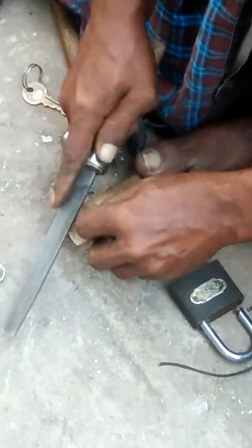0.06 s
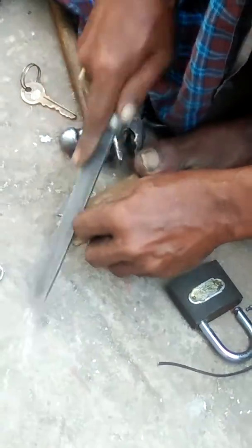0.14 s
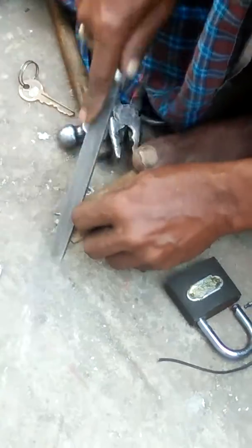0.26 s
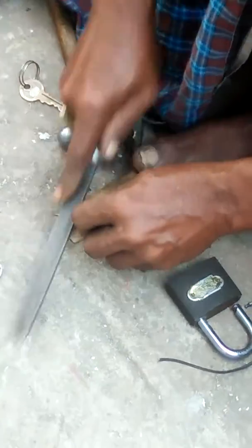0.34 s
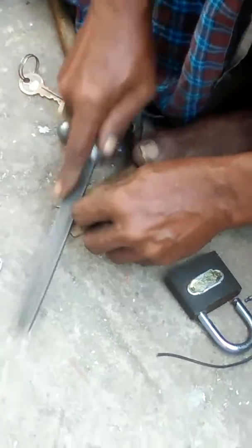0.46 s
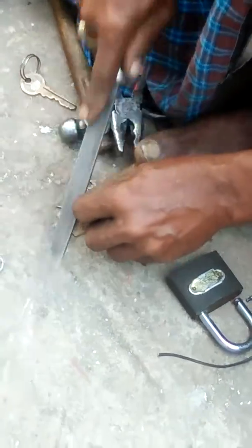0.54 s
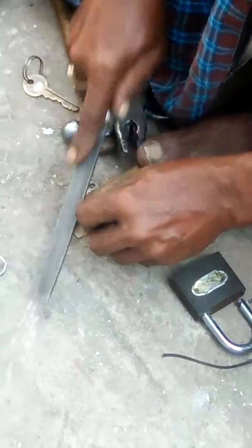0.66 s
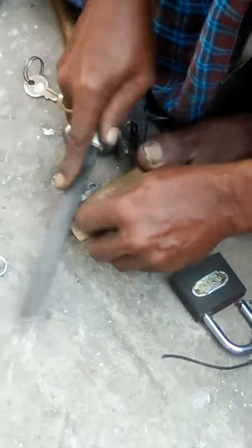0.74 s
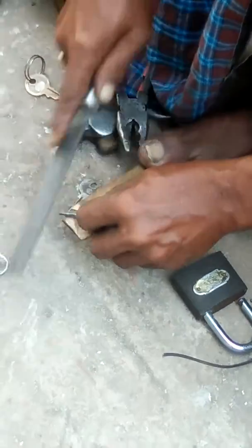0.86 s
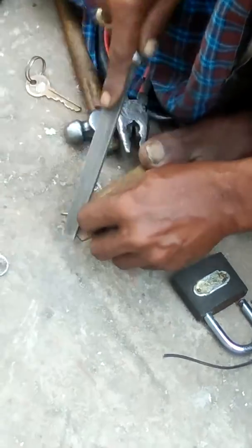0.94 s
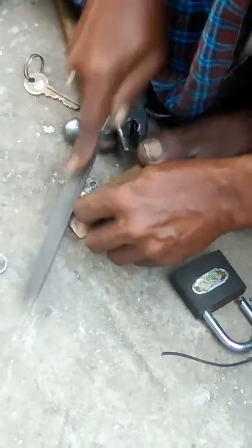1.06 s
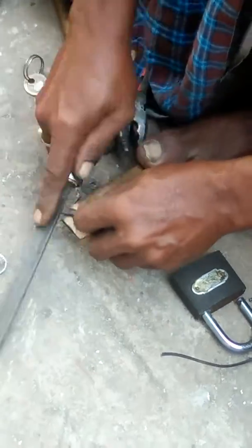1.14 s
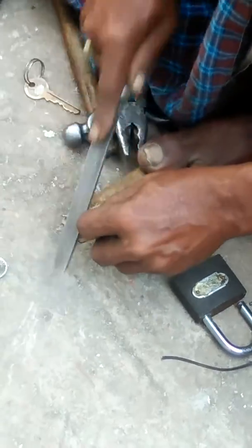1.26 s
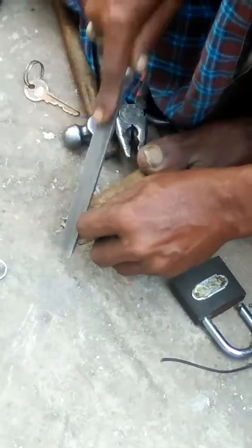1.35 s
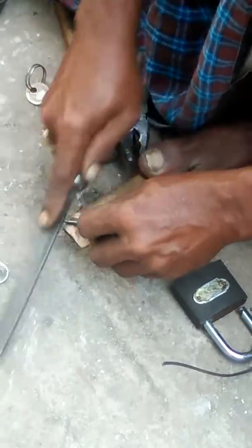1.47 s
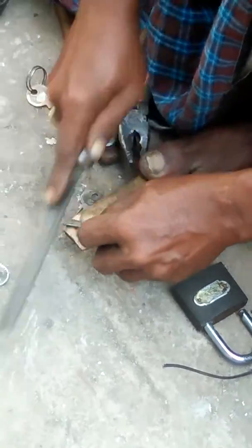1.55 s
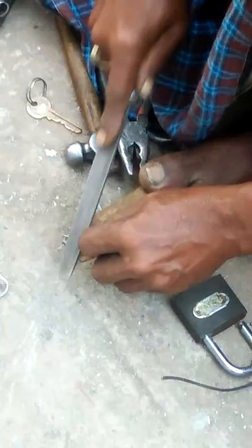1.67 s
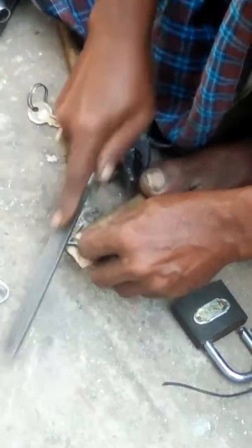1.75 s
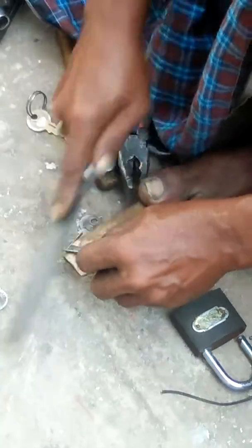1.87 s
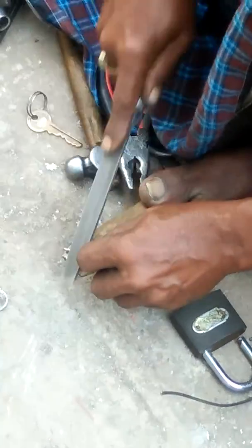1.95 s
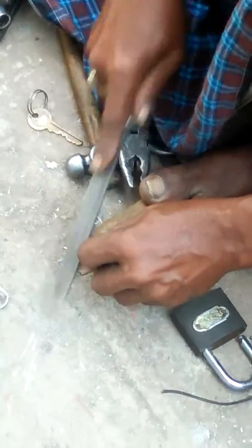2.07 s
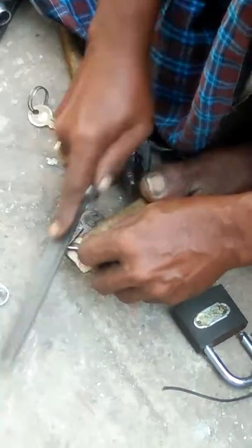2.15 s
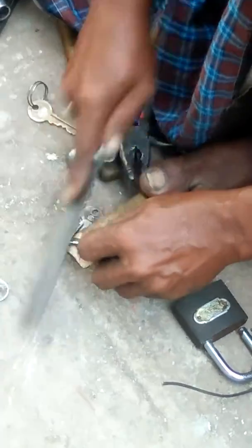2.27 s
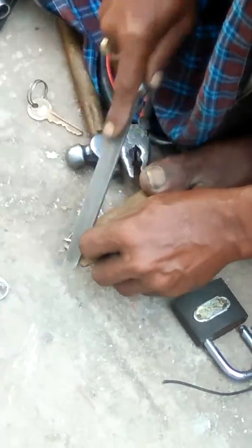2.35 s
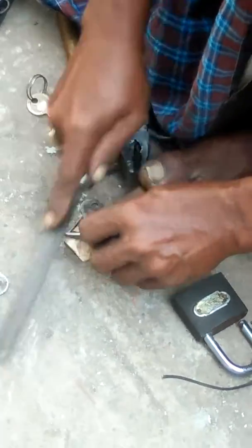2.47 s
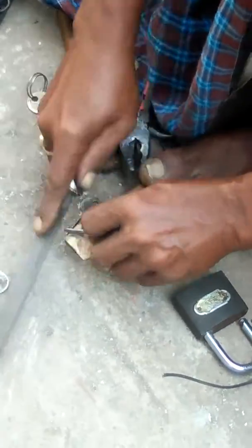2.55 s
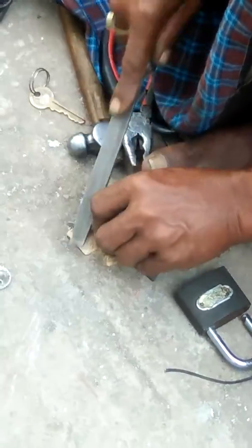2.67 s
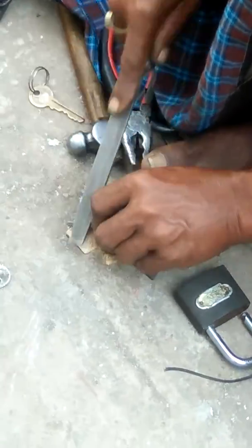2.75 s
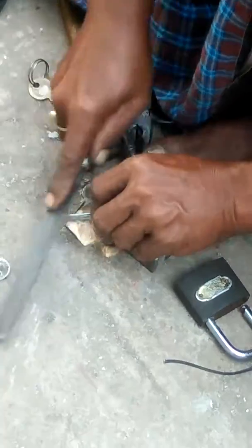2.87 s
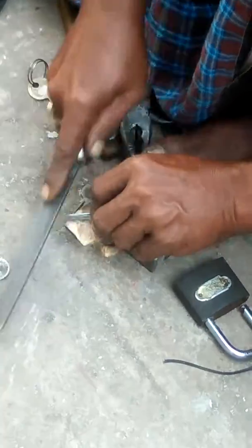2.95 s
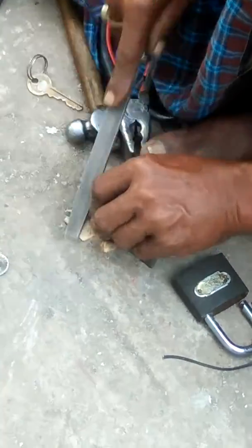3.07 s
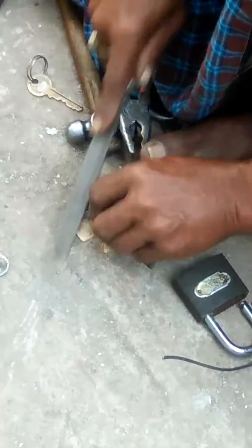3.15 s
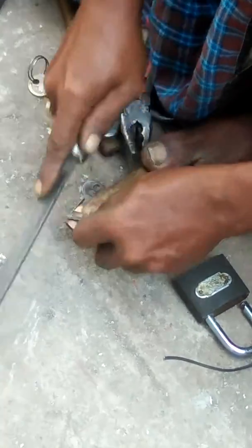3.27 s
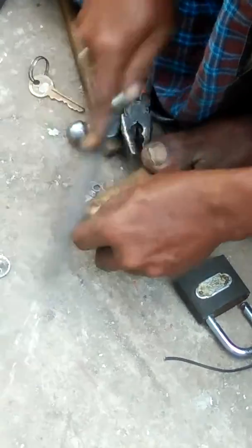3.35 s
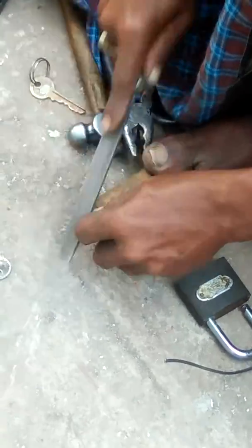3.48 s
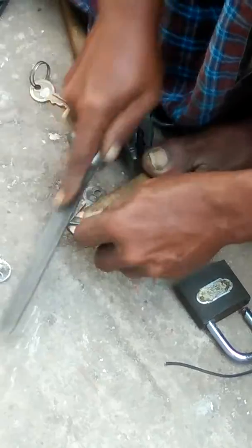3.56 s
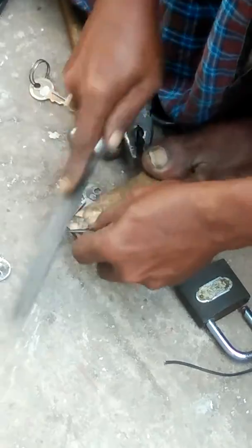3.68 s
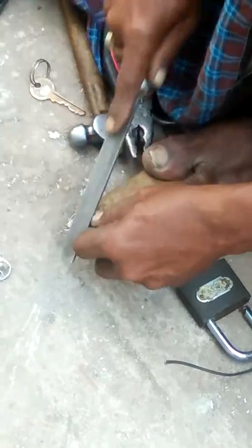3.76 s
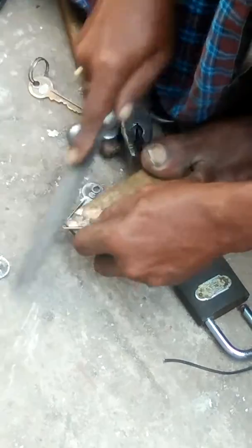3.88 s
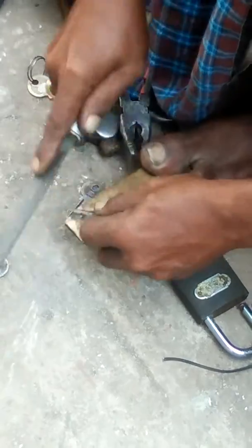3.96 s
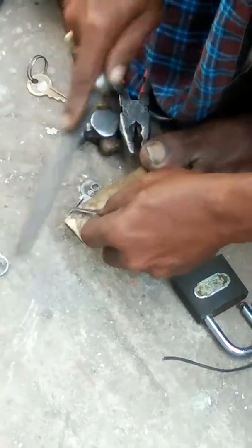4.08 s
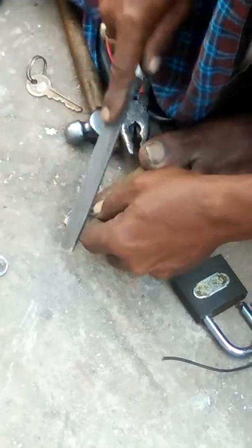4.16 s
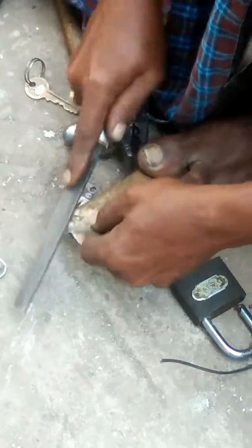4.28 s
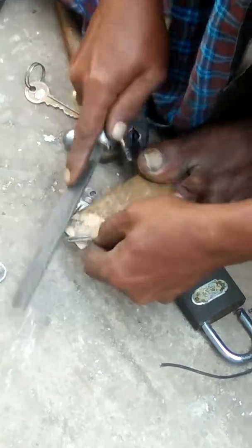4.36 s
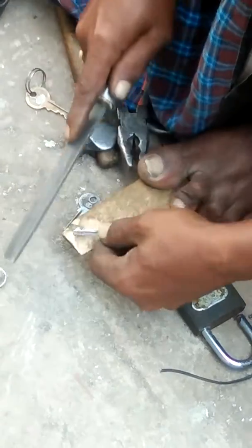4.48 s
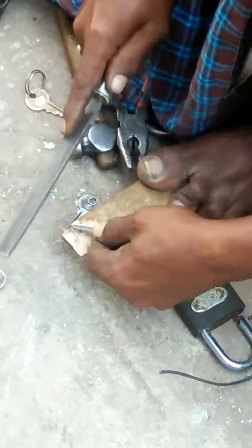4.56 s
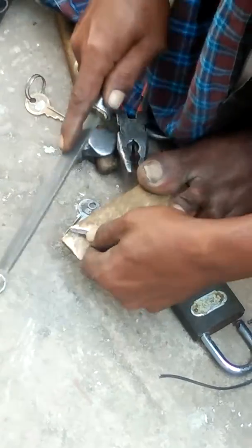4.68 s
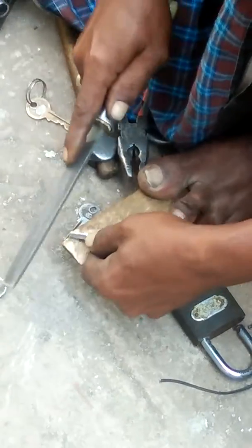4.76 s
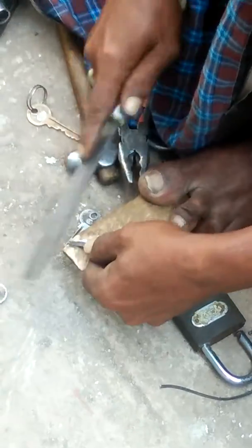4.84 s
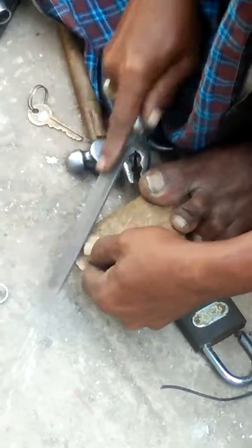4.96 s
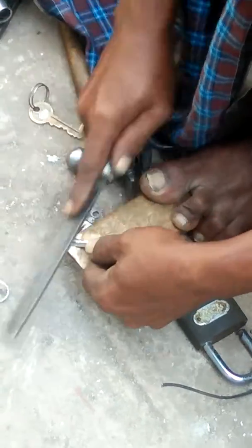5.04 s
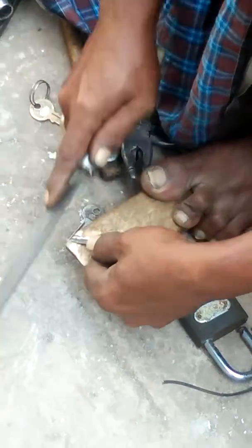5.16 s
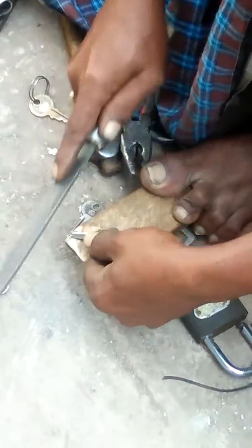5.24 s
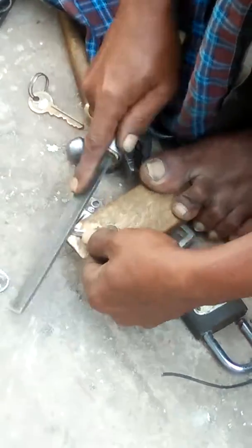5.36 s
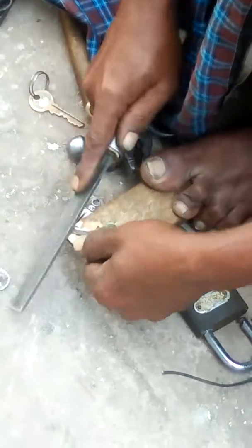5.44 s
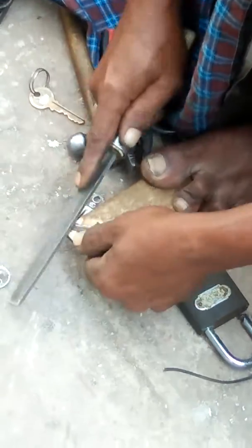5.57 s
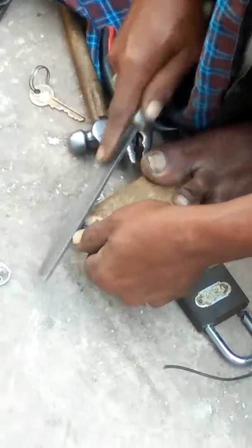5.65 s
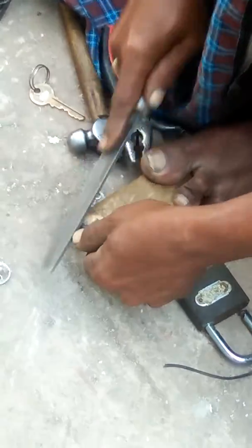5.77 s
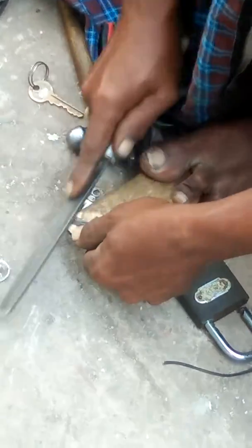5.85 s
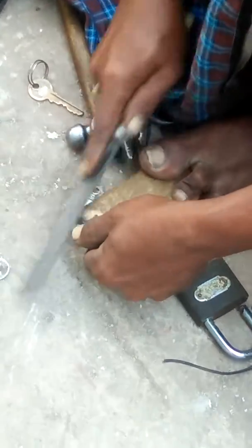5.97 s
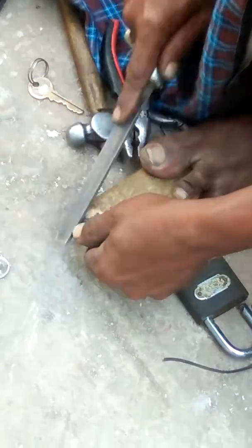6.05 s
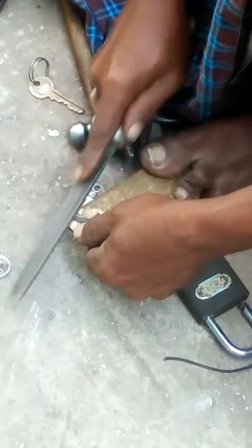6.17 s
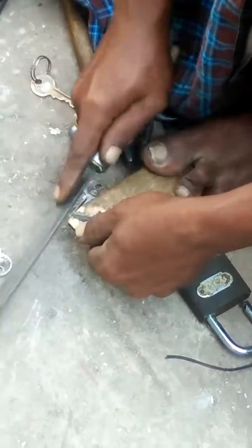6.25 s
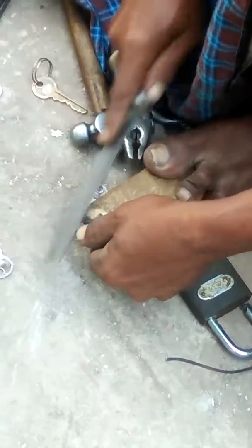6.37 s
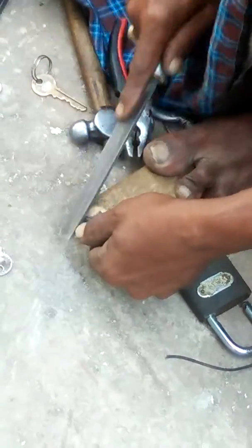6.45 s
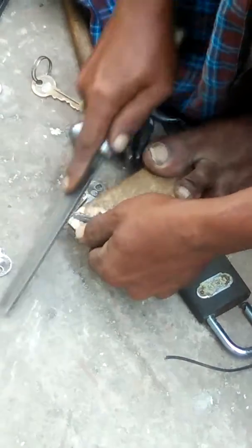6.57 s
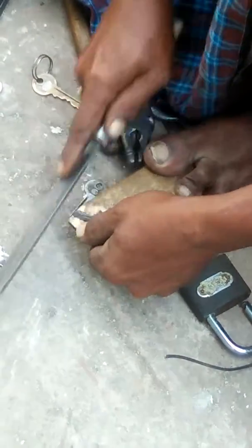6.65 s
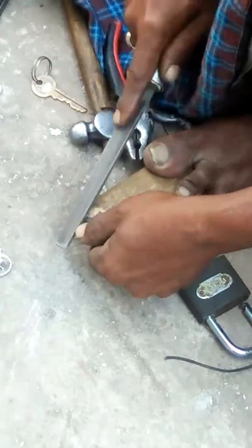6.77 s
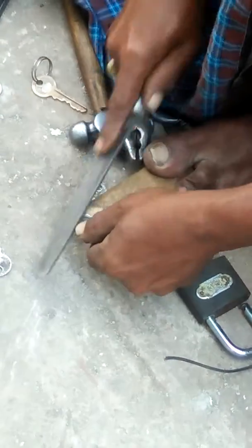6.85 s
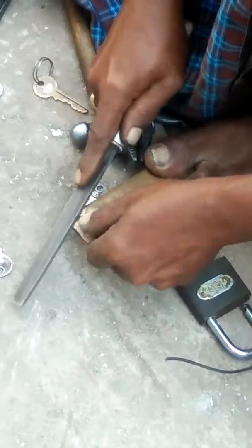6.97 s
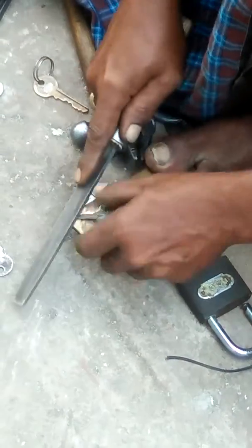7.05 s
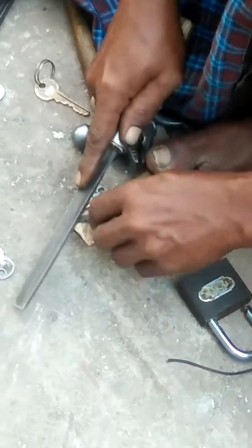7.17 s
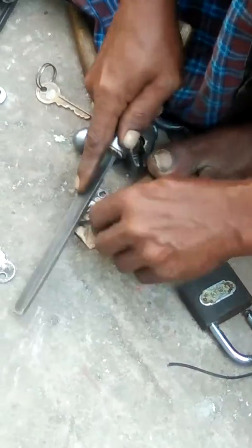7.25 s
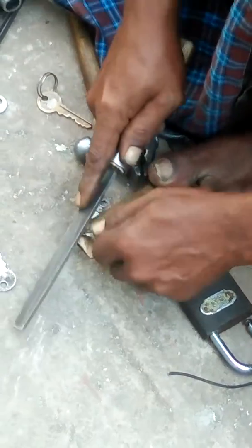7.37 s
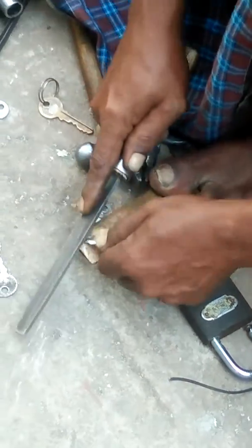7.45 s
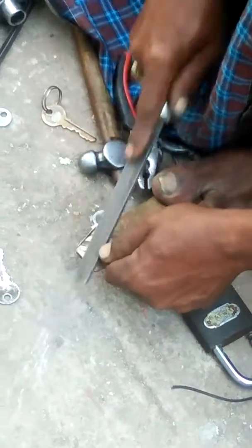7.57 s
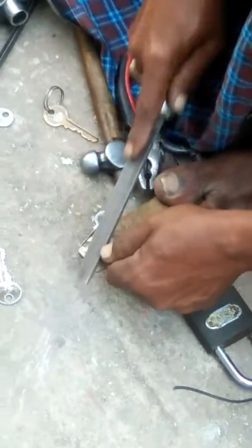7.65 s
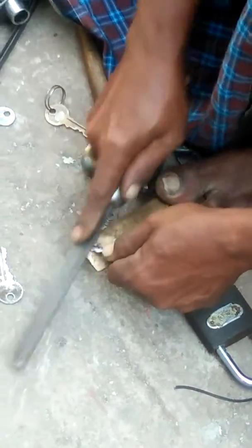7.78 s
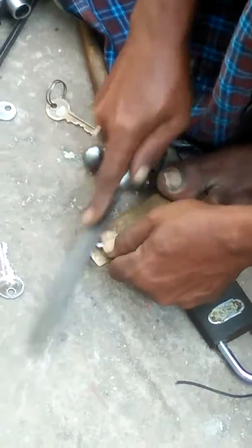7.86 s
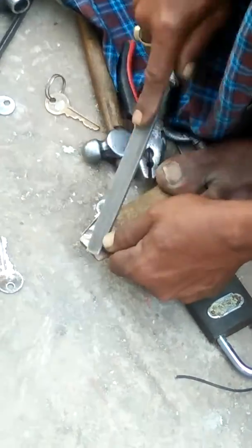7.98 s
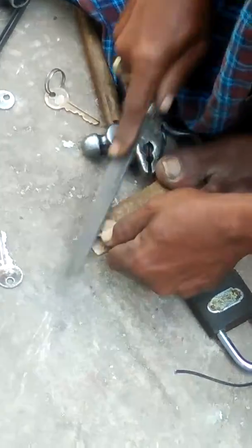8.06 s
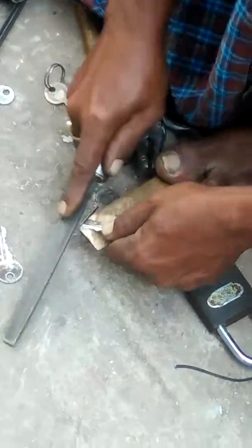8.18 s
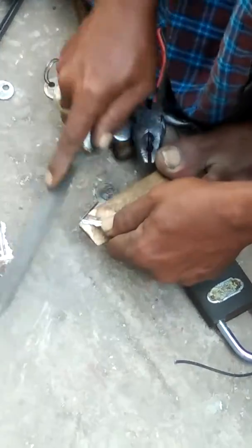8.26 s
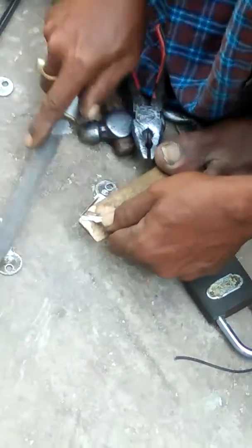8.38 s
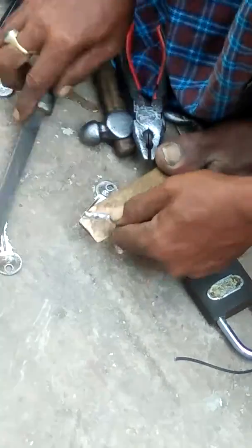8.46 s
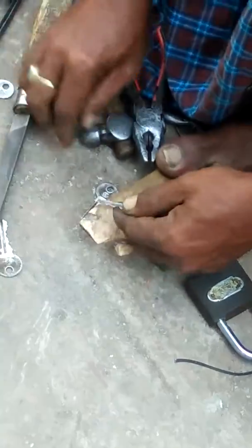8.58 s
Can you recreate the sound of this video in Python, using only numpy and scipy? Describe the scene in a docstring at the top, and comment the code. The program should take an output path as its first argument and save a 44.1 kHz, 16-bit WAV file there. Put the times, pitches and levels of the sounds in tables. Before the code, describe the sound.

A close microphone catches a flat metal file working a brass key on a wooden block, with a short reflection from nearby walls and a low, distant traffic murmur. Faint horn tones sound from 0 to 0.5 s, and slight handling bumps come around 0.4-0.6 s. Until about 4.1 s, brisk back and forward strokes alternate, roughly three pairs per second, each a gritty rasp of about a tenth of a second, swelling and easing. Small clicks and woody knocks mark contacts; brief high squeals chirp between 1.5 and 2.6 s, with a lower one at 3 s. Single scrapes follow near 4.4 and 5.1 s, separated by quiet gaps. Paired strokes return at 5.8-7.1 s, with light metal ticks at 6.1-6.9 s. Very faint horns appear around 7-7.5 s during a pause. Final rasping strokes run 7.65-8.35 s, then a tiny key-ring jingle at 8.5 s.

```python
"""A hand file cuts a brass key blank on a wooden block, close by; walls answer, a street murmurs far off.
0-0.5 s: distant horn tones. Up to 4.1 s: brisk back and forward strokes, tooth strikes plus torn-chip noise,
each an arch of speed and pressure; noise-burst taps on key and block; brief squeals at 1.5-3 s.
4.1-8.4 s: sparser strokes and taps; light metal ticks at 6.1-6.9 s, faint horn tones at 7-7.5 s.
8.5 s: a key ring jingles, as a sum of decaying modes."""
import sys
import numpy as np
from scipy import signal
from scipy.fft import rfft, irfft, next_fast_len
from scipy.io import wavfile
from scipy.ndimage import uniform_filter1d, map_coordinates

SR = 44100
rng = np.random.default_rng(int(sys.argv[2]) if len(sys.argv) > 2 else 0)


def wav_record(signal):
    """Record a signal, one row per channel, as 16-bit PCM in the file named by sys.argv[1]."""
    frames = np.transpose(np.atleast_2d(signal))
    bounded = np.clip(frames, -1, 1)
    # unit amplitude maps onto the largest positive 16-bit level
    quanta = np.round(bounded * 32767).astype(np.int16)
    wavfile.write(sys.argv[1], SR, quanta)


N = 380141

# far traffic colour: f/Hz, density/(dB per Hz)
STREET_COLOUR = [(25, -16.5), (55, -9), (170, -12.5), (330, -9), (600, -5.5), (1000, -5.5), (1550, -6.5),
                 (2000, -9), (4000, -35.5), (8000, -37), (14000, -48.5)]
# traffic swell: t/s, level/dB (only the departure from the mean counts)
STREET_SWELL = [(0.0, -75), (3.26, -74), (4.53, -78.5), (6.66, -72.5), (7.35, -76), (8.6, -78)]
# distant horn tones: start/s, end/s, f/Hz, level/dB
HORNS = [(0, 0.488, 736, -52), (0.077, 0.49, 789, -49.5), (0, 0.3, 1543, -55), (0.049, 0.43, 1620, -49),
         (6.951, 7.555, 1460, -66), (7.38, 7.48, 1627, -66)]
# shifts of the hand holding the microphone: start/s, end/s, level/dB
HANDLING = [(0.398, 0.452, -54.5), (0.524, 0.656, -64), (2.68, 2.857, -68), (3.926, 4.102, -65)]
# wall answer: f/Hz, t60/s
ROOM_T60 = [(200, .35), (1000, 0.48), (3000, 0.34), (5000, 0.27), (8000, 0.22), (14000, 0.36)]
# key ring nudges: t/s, level/dB
JINGLES = [(8.517, -40.5), (8.533, -40), (8.549, -41)]
# key ring modes: f/Hz, level/dB, t60/s
RING_MODES = [(2840, -1, 0.029), (3070, 2.5, .035), (3850, -6.5, 0.033), (7170, -31, 0.13),
              (9550, -33, .22)]
# light touches of loose metal: t/s, level/dB (before trim), ring f/Hz
TICKS = [(6.1355, -35, 4620), (6.5042, -31, 4400), (6.84, -35, 4740), (6.8608, -31, 4530)]
# file lands on the key or catches in the cut: t/s, level/dB (before trim), knock re click/dB (before trim)
TAPS = [(0.163, -23, -3.5), (0.6085, -21, -12.5), (0.738, -28, 5.5), (0.7679, -10.5, -12.5),
        (1.065, -19, -15), (1.491, -19, -10), (1.7398, -18, -18), (1.965, -19, -1), (2.186, -17.5, -18),
        (2.533, -16, -21), (2.8063, -20.5, -1.5), (3.1736, -27, 0), (3.267, -21, 1), (3.5548, -15.5, -19),
        (3.7616, -19, 3), (3.9036, -14, -9.5), (4.0655, -27.5, -1.5), (4.3213, -28.5, 9), (4.4524, -26, -4),
        (5.0762, -31.5, 11.5), (5.5274, -20, 6.5), (6.188, -29, -5.5), (6.573, -23, -23),
        (6.747, -18, -1.5), (6.9106, -16, -3), (8.3273, -17, -3)]
# landing, steel on brass: f/Hz, density/(dB per Hz)
CLICK_COLOUR = [(300, -54), (1500, -22), (2300, 0.5), (3100, 3.5), (4000, -4.5), (4800, -6), (6000, -18),
                (8500, -34.5), (14000, -40.5)]
# landing, block beneath: f/Hz, density/(dB per Hz)
KNOCK_COLOUR = [(150, -50.5), (480, -21.5), (720, 1), (1200, 6), (2000, -5), (5000, -59.5)]
# file sticks and sings: start/s, end/s, first f/Hz, last f/Hz, level/dB
SQUEALS = [(1.5, 1.57, 4750, 5100, -31), (1.845, 1.895, 4720, 4950, -33.5), (2.195, 2.25, 4750, 5000, -34),
           (2.545, 2.6, 4620, 4950, -28), (3.01, 3.045, 2310, 2310, -26.5)]
# back strokes: start/s, end/s, top tooth rate/Hz, chatter power share/0-1, body/dB, edge/dB, hiss/dB,
# level at hardest point/dB, hardest point/0-1 of stroke, sag at the ends/dB
BACK_STROKES = [(0, 0.197, 910, 0, 21.5, -12, 5, -58, 0.8, 0),
                (0.209, 0.364, 1252, 0, 11, 0, 0.5, -24.5, 0.64, 11),
                (0.578, 0.723, 1050, 0.04, 5.5, -4.5, -2.5, -23.5, 0.42, 16),
                (1.061, 1.121, 1456, 0.03, 2.5, -6, -1, -32.5, 0.4, 8),
                (1.337, 1.466, 1103, 0.15, 3, -7.5, 0.5, -23.5, 0.32, 14),
                (1.733, 1.83, 1307, 0, 9, -5, -2.5, -24.5, 0.28, 15.5),
                (2.082, 2.163, 1406, 0, 5.5, -9, -4, -23, 0.27, 13),
                (2.42, 2.515, 1412, 0.21, -5, -1, -1.5, -21, 0.35, 12.5),
                (2.803, 2.876, 1450, 0, -1.5, -0.5, -1.5, -25, 0.26, 15.5),
                (3.171, 3.243, 1153, 0.04, 10.5, 2.5, 0, -26.5, 0.36, 14.5),
                (3.549, 3.622, 1106, 0.01, 10.5, -6, 1, -30, 0.58, 12),
                (3.902, 3.962, 1095, 0, 5, 0, 2.5, -31, 0.4, 6.5),
                (5.769, 5.902, 1048, 0.13, 11.5, -15, -5, -36, 0.81, 29),
                (6.179, 6.242, 1050, 0, 10.5, -17, -7.5, -31.5, 0.47, 14),
                (6.57, 6.608, 1050, 0.01, 6.5, -19, -4, -39, 0.9, 7),
                (6.974, 7.123, 1204, 0.03, 10.5, -14, -8.5, -37, 0.6, 12.5),
                (7.653, 7.806, 944, 0.09, 5.5, -8, -8.5, -27.5, 0.53, 29),
                (8.034, 8.155, 1098, 0.02, 2, -6.5, -1.5, -29, 0.36, 12)]
# forward strokes: columns as BACK_STROKES
FORWARD_STROKES = [(0.394, 0.531, 1903, 0.1, 4, 1.5, 0.5, -21, 0.56, 7),
                   (0.758, 0.93, 1412, 0.04, 6, 1, -0.5, -29.5, 0, 16.5),
                   (1.132, 1.278, 2144, 0.06, -2.5, 3, -1, -19, 0.64, 14.5),
                   (1.482, 1.633, 1954, 0.04, 5.5, -1, 2.5, -24.5, 0.36, 10.5),
                   (1.832, 1.976, 1954, 0.02, 5, -4.5, 1.5, -26.5, 0.7, 6.5),
                   (2.186, 2.328, 1977, 0.11, 3.5, -3, 2.5, -25.5, 0.63, 9),
                   (2.529, 2.681, 1913, 0.06, 1, -0.5, 0.5, -22.5, 0.75, 7),
                   (2.895, 3.055, 1549, 0.06, 7.5, 2.5, -1.5, -19.5, 0.54, 9),
                   (3.262, 3.401, 1544, 0.06, 6, -1, -1, -22, 0.51, 11),
                   (3.646, 3.779, 1904, 0.32, 12, 1, 9.0, -28.5, 0.57, 9.5),
                   (3.994, 4.078, 1150, 0.21, -2, 7, 7.0, -35, 0.89, 12),
                   (4.378, 4.464, 1299, 0.28, 8.5, 2.5, -2.5, -27, 0.97, 12.5),
                   (5.125, 5.256, 1299, 0.04, 12, -2.5, 0.5, -29.5, 0.66, 9.5),
                   (5.919, 6.071, 1305, 0.04, 12.5, 4, -1, -27.5, 0.51, 14),
                   (6.271, 6.414, 1542, 0.01, 11, 1.5, -1, -26.5, 0.4, 12.5),
                   (6.633, 6.782, 1406, 0, 12, 1.5, -2, -26.5, 0.41, 15.5),
                   (7.83, 7.971, 1016, 0.15, 9, -2, 1.5, -26.5, 0.64, 9.5),
                   (8.19, 8.344, 1150, 0.17, 10.5, -4.5, 4, -28.5, 0.7, 13)]
# rasp colour, back: f/Hz, density/(dB per Hz)
BACK_COLOUR = [(350, -81.5), (517, -32), (739, -11.5), (905, -7), (1690, -6), (1970, -2.5), (2450, -3),
               (3010, 6.5), (3510, -2.5), (4300, 4), (5870, -14), (7190, -19), (8270, -28), (14500, -36.5)]
# rasp colour, forward: f/Hz, density/(dB per Hz)
FORWARD_COLOUR = [(350, -68.5), (517, -43), (567, -18), (728, -13), (964, -9.5), (1200, -5.5), (1560, -6.5),
                  (2100, -5.5), (3010, 3.5), (4950, -7.5), (5690, -14.5), (7900, -32.5), (10500, -36),
                  (14500, -43)]
# resonances of file, key and block: f/Hz, width/Hz, relative level/dB
WORK_MODES = [(758, 33, -1), (1186, 38, -10.5), (1390, 40, -10.5), (1525, 45, -8), (2230, 140, -3.5),
              (3036, 160, -10), (3860, 150, -3.5), (4704, 370, -1.5)]
# teeth dig in, rasp swells: t/s, rise/dB
CATCHES = [(0.265, 2.5), (0.506, 3), (0.642, 1.5), (1.21, 4.8), (2.621, 2.5), (2.662, 4.5), (3.334, 4.5),
           (4.447, 3.5), (5.985, 3), (7.712, 3.5), (7.783, 5.5), (8.33, 4)]
# side gain of a second noise draw: f/Hz, gain/dB
SIDE_GAIN = [(3700, -69), (5000, -33), (6500, -14), (14000, -6.5)]
# microphone treble ripple: f/Hz, gain/dB
MIC_RIPPLE = [(6700, -0.5), (7150, 3), (7900, -2), (10500, 2), (12000, -2.5), (12500, 1)]

STREET_RMS_DB = -62  # before the swell
GRIT_DB = 2.8  # bound on the uneven bite of the teeth
SPILL_S, RELEASE_S = .04, .005  # room after a stroke; time constant of letting go
WHIRR_DB, WHIRR_OCTAVES, UNDER_DB = 1, 0.12, -5  # rise at the tooth rate, its width, gain from half an octave down
CATCH_S_PER_DB = .0028  # a deeper bite takes longer to tear free
TOP_HZ = 14350  # upper band limit


def amp(db):
    """Decibels to gain."""
    return 10 ** (np.asarray(db) / 20)


def unit(x):
    """Scale to rms 1."""
    return x / np.sqrt(np.mean(x ** 2) + 1e-20)


def along(points, hz):
    """Interpolate (f/Hz, value) points on a log frequency axis."""
    f, v = np.transpose(points)
    return np.interp(np.log(hz + 1), np.log(f + 1), v)


def wobble(rate_hz, size):
    """Smooth random curve with rate_hz knots a second."""
    knots = rng.standard_normal(int(size * rate_hz / SR) + 4)
    return map_coordinates(knots, [np.arange(size) * rate_hz / SR])


def filtered(x, response):
    """Filter x by a real gain over frequency."""
    n = x.shape[-1]
    m = next_fast_len(n + 8192)
    return irfft(rfft(x, m) * response(np.fft.rfftfreq(m, 1 / SR)), m)[..., :n]


def impulse(points, size=2048):
    """Causal (minimum-phase) impulse response of a spectrum, peak 1."""
    cepstrum = irfft(np.log(amp(along(points, np.fft.rfftfreq(size, 1 / SR)))))
    fold = np.r_[1, np.full(size // 2 - 1, 2), np.zeros(size // 2)]
    h = irfft(np.exp(rfft(cepstrum * fold)))
    return h / np.abs(h).max()


def add(track, start_s, sound):
    """Mix a sound into a track at start_s."""
    i = max(0, round(start_s * SR))
    track[i:i + len(sound)] += sound[:max(0, N - i)]


def gate(t, start_s, end_s, rise_s, fall_s):
    """Linear rise from start_s, exponential fall after end_s."""
    return np.clip((t - start_s) / rise_s, 0, 1) * np.exp(-np.maximum(t - end_s, 0) / fall_s)


def patchy(x, depth_db, size, top_hz):
    """Narrow patches of sound swell and fade, more weakly above top_hz."""
    hz, _, z = signal.stft(x, SR, nperseg=size)
    field = uniform_filter1d(rng.standard_normal(z.shape), size=3, axis=0)
    field = uniform_filter1d(field, size=7, axis=1)
    depth = depth_db / (1 + (hz[:, None] / top_hz) ** 2)
    return signal.istft(z * amp(depth * unit(field)), nperseg=size)[1][:len(x)]


def tone(length_s, first_hz, last_hz, waver_rad):
    """A tone wavering in phase and level that starts, glides and stops."""
    t = np.arange(int((length_s + .15) * SR)) / SR
    glide_hz = np.interp(t, [0, length_s], [first_hz, last_hz])
    phase = 2 * np.pi * np.cumsum(glide_hz) / SR + waver_rad * wobble(260, len(t))
    flutter = amp(3.2 * wobble(45.2, len(t)))
    return gate(t, 0, length_s, rise_s=0.01, fall_s=.015) * unit(flutter * np.sin(phase))


def traffic():
    """Far traffic merges into patchy coloured noise that swells slowly."""
    noise = patchy(rng.standard_normal(N), depth_db=3.8, size=2048, top_hz=2500)
    noise = unit(filtered(noise, lambda hz: amp(along(STREET_COLOUR, hz))))
    swell_db = np.interp(np.arange(N) / SR, *np.transpose(STREET_SWELL))
    return noise * amp(STREET_RMS_DB) * amp(swell_db - swell_db.mean())


def horns():
    """Distant horns sound as steady-pitched, slightly wavering tones."""
    out = np.zeros(N)
    for start_s, end_s, hz, db in HORNS:
        add(out, start_s, amp(db) * tone(end_s - start_s, hz, hz, waver_rad=.45))
    return out


def handling_rumble():
    """Low noise from the hand on the microphone: a wandering floor and a few shifts."""
    colour = [(20, -23.5), (55, 4.0), (85, -3.0), (150, -14.5), (500, -65.5)]  # f/Hz, dB
    rumble = unit(filtered(rng.standard_normal(N), lambda hz: amp(along(colour, hz))))
    t = np.arange(N) / SR
    level = amp(-77.0 + 3.3 * wobble(7.3, N))
    for start_s, end_s, db in HANDLING:
        level = level + amp(db) * gate(t, start_s, end_s, rise_s=0.0081, fall_s=0.032)
    return rumble * level


def room(x, wet_db):
    """Walls answer with noise tails, t60 set by frequency; a fresh tail fades in every third of a second."""
    hop = SR // 3
    window = np.sin(np.pi * np.arange(2 * hop) / (2 * hop))
    padded = np.pad(x, (hop, 2 * hop))
    wet = np.zeros(N + 3 * SR)
    for i in range(0, N + hop, hop):
        hz, t, z = signal.stft(rng.standard_normal(SR // 2), SR, nperseg=256)
        decay = amp(-60 * t / along(ROOM_T60, hz)[:, None])
        decay = decay + 1.1 * amp(-60 * t / 0.057)  # strong early part
        tail = signal.istft(z * decay, SR, nperseg=256)[1]
        echo = signal.fftconvolve(padded[i:i + 2 * hop] * window, tail / np.linalg.norm(tail))
        wet[i + int(.004 * SR):][:len(echo)] += echo
    return x + amp(wet_db) * wet[hop:hop + N]


def key_ring():
    """Each nudge excites the key ring's decaying modes anew, with unsteady phase."""
    out, t = np.zeros(N), np.arange(SR // 3) / SR
    for start_s, db in JINGLES:
        ring = np.zeros(len(t))
        for hz, mode_db, t60_s in RING_MODES:
            phase = 2 * np.pi * (hz * t + rng.random()) + .7 * wobble(600, len(t))
            ring += amp(mode_db - 60 * t / t60_s) * np.sin(phase)
        add(out, start_s, amp(db) * ring * (1 - np.exp(-t / 0.0006)))
    return out


def ticks():
    """Loose metal touches lightly: a short noise scratch through one broad resonance."""
    out, t = np.zeros(N), np.arange(SR // 3) / SR
    for start_s, db, ring_hz in TICKS:
        scratch = rng.standard_normal(len(t)) * amp(-60 * t / 0.022) * (1 - np.exp(-t / 0.0033))
        colour = [(ring_hz / 2, -30), (ring_hz * 0.8, -13), (ring_hz, 0),
                  (ring_hz * 1.15, -13), (ring_hz * 1.7, -24), (14000, -30)]
        tick = signal.fftconvolve(scratch, impulse(colour))
        add(out, start_s, amp(db - 1.5) * tick / np.abs(tick).max())
    return out


def taps():
    """File meets key: a short crunch clicks in the metal; a crunch plus one blow knocks the block."""
    out, t = np.zeros(N), np.arange(SR // 20) / SR
    click, knock = impulse(CLICK_COLOUR), impulse(KNOCK_COLOUR)
    for start_s, db, knock_db in TAPS:
        crunch = rng.standard_normal((2, len(t))) * amp(-60 * t / 0.012) * (1 - np.exp(-t / 0.0012))
        crunch[1, int(.0015 * SR)] += 2  # the blow
        high = signal.fftconvolve(crunch[0], click)
        low = signal.fftconvolve(crunch[1], knock)
        high, low = high / np.abs(high).max(), low / np.abs(low).max()
        add(out, start_s, amp(db - 3.5) * (high + amp(knock_db - 0.5) * low))
    return out


def squeals():
    """The file sticks and sings for a moment: wavering tones, most gliding up."""
    out = np.zeros(N)
    for start_s, end_s, first_hz, last_hz, db in SQUEALS:
        add(out, start_s, amp(db) * tone(end_s - start_s, first_hz, last_hz, waver_rad=1.7))
    return out


def sliding(x, reach_m, echo_db):
    """Bending waves return from the file's tip; as the reach changes, their peaks and notches glide."""
    hz, s, z = signal.stft(x, SR, nperseg=256)
    metres = np.interp(s * SR, np.arange(len(x)), reach_m)
    cycles = 2 * metres * np.sqrt(hz[:, None] / 18)  # bending waves run faster with pitch
    return unit(signal.istft(z * amp(echo_db * np.cos(2 * np.pi * cycles)), nperseg=256)[1][:len(x)])


def whirr(x, rate_hz):
    """Unevenly spaced teeth pile noise up around their rate and thin it below; the band glides with speed."""
    hz, s, z = signal.stft(x, SR, nperseg=512, noverlap=384)
    octaves = np.log2((hz[:, None] + 1) / np.interp(s * SR, np.arange(len(x)), rate_hz))
    gain_db = WHIRR_DB * np.exp(-(octaves / WHIRR_OCTAVES) ** 2)
    gain_db = gain_db + UNDER_DB * np.clip(-2 * octaves, 0, 1)
    return signal.istft(z * amp(gain_db), nperseg=512, noverlap=384)[1][:len(x)]


def work_resonance(hz):
    """Gain of file, key and block: resonances add in power to a flat floor."""
    power = 0.59
    for mode_hz, width_hz, db in WORK_MODES:
        power = power + amp(2 * db) * 2.48 / (1 + ((hz - mode_hz) / (width_hz / 2)) ** 2)
    return np.sqrt(power)


def bite(progress, level_db, hardest, sag_db):
    """The hand leans in towards the hardest point of a stroke and eases off: an arch in dB."""
    hardest = np.clip(hardest, .02, .98)
    away = np.maximum((hardest - progress) / hardest, (progress - hardest) / (1 - hardest))
    return amp(level_db - sag_db * away ** 2)


def digging(t):
    """Gain of the rasp where the teeth dig in."""
    return amp(sum(db * np.exp(-((t - s) / (CATCH_S_PER_DB * db)) ** 2) for s, db in CATCHES))


def stroke(row, colour, travel_m, slowing, jitter_hz, judder_db, attack_s):
    """Teeth strike the key's edge at a rate that follows the hand's speed; each tears off a noisy chip."""
    start_s, end_s, tooth_hz, chatter, body_db, edge_db, hiss_db, level_db, hardest, sag_db = row
    t = start_s + np.arange(int((end_s - start_s + SPILL_S) * SR)) / SR
    n = len(t)
    progress = np.clip((t - start_s) / (end_s - start_s), 0, 1)
    rate_hz = tooth_hz * (1 - slowing * (2 * progress - 1) ** 2)
    teeth = np.cumsum(rate_hz + jitter_hz * wobble(698.8, n)) / SR
    strikes = np.sin(2 * np.pi * teeth) + amp(-7) * np.sin(4 * np.pi * teeth)
    strikes = strikes * (.4 + np.sin(np.pi * np.sqrt(progress)))  # clearest early in the stroke
    chips = rng.standard_normal(n) * (1 + 0.54 * np.cos(2 * np.pi * teeth))
    # contact travels along the blade
    reach_m = rng.uniform(.14, .22) - travel_m * np.cos(np.pi * progress) / 2
    chips = whirr(sliding(chips, reach_m, echo_db=4.3), rate_hz)
    chips = patchy(chips, depth_db=2.3, size=256, top_hz=20000)
    # firmer seat adds body, sharper corner adds edge, finer chips add hiss
    tilt = [(1300, body_db), (2300, 0), (3600, 0.0023), (4400, edge_db), (6500, hiss_db)]

    def shape(hz):
        """Stroke colour, tilt and resonances together."""
        return amp(along(colour, hz) + along(tilt, hz)) * work_resonance(hz)

    # bounded bursts from uneven teeth, slower judder of the hand
    uneven = amp(GRIT_DB * np.tanh(wobble(800, n)) + judder_db * np.tanh(wobble(110, n)))
    share = np.clip(chatter, 0, 1)
    rasp = np.sqrt(share) * unit(filtered(strikes * uneven, shape))
    rasp = rasp + np.sqrt(1 - share) * unit(filtered(chips * uneven, shape))
    pressure = bite(progress, level_db, hardest, sag_db) * digging(t)
    return rasp * pressure * gate(t, start_s, end_s, attack_s, RELEASE_S)


def filing():
    """All back and forward strokes, with the squeals of the sticking file."""
    out = squeals()
    for row in BACK_STROKES:
        add(out, row[0], stroke(row, BACK_COLOUR, travel_m=0.037, slowing=0.32,
                                jitter_hz=55, judder_db=1.0, attack_s=.004))
    for row in FORWARD_STROKES:
        add(out, row[0], stroke(row, FORWARD_COLOUR, travel_m=0.064, slowing=.48,
                                jitter_hz=70.5, judder_db=0.9, attack_s=0.0077))
    return out


def scene():
    """Mid holds all sources; faint high hiss at the sides follows the strokes."""
    outside = traffic() + horns() + handling_rumble()
    metal = room(key_ring() + ticks() + taps(), wet_db=-3.5)
    mid = outside + metal + room(filing(), wet_db=-7.5)
    side = filtered(filing(), lambda hz: amp(along(SIDE_GAIN, hz)))
    return np.array([mid + side, mid - side])


def record(dry):
    """The microphone ripples the treble; nothing passes from TOP_HZ up."""
    return filtered(dry, lambda hz: amp(along(MIC_RIPPLE, hz)) * (hz < TOP_HZ))


dry = scene()
out = record(dry)
wav_record(out)
```